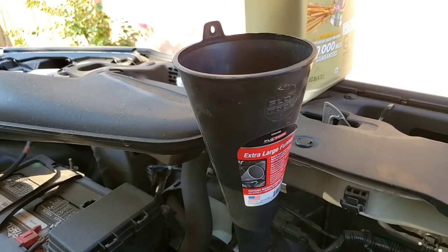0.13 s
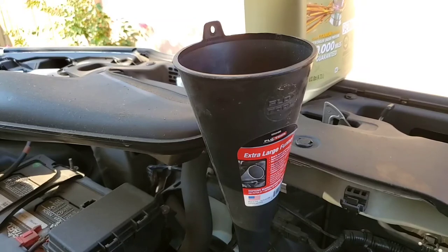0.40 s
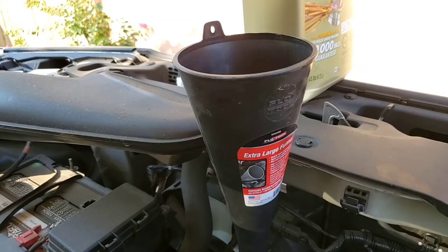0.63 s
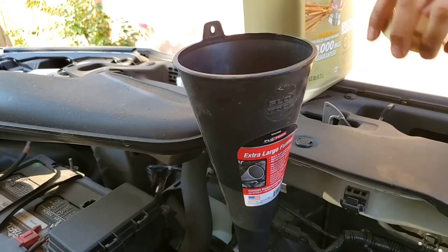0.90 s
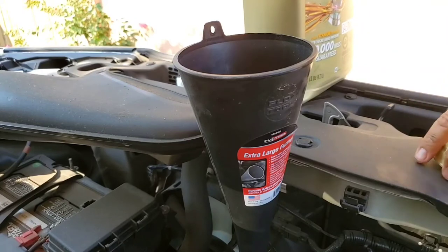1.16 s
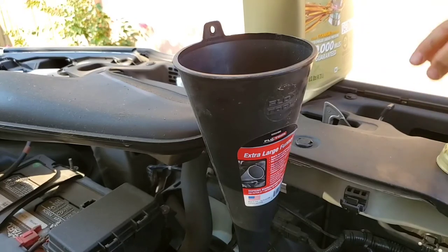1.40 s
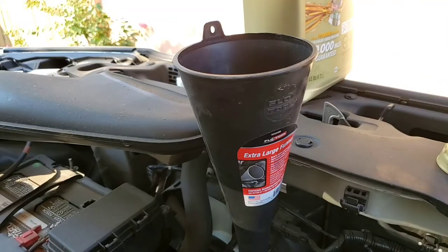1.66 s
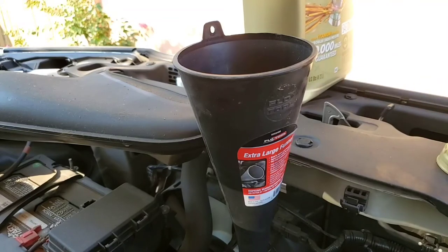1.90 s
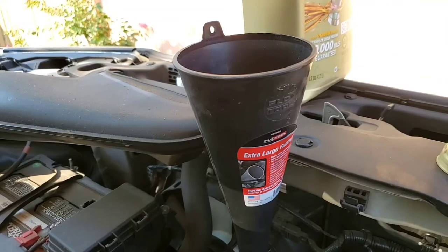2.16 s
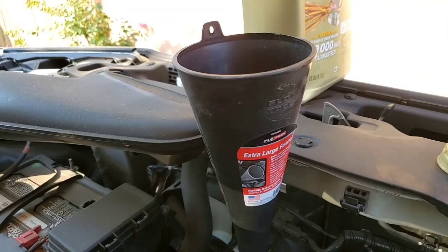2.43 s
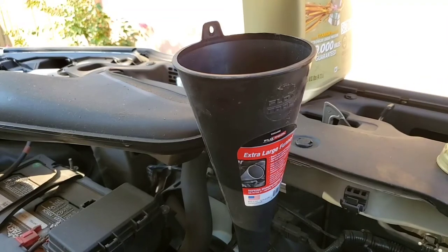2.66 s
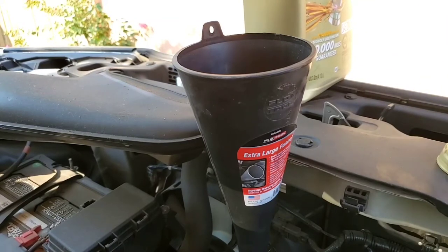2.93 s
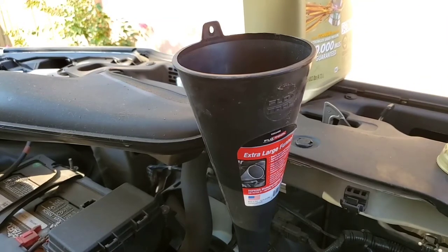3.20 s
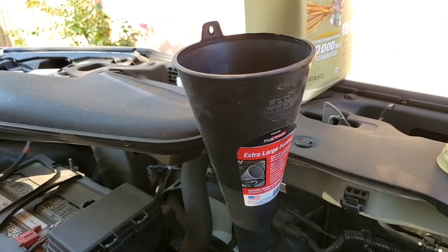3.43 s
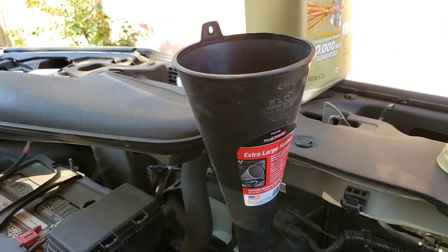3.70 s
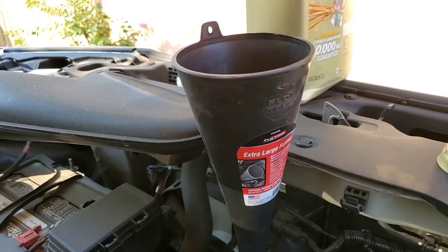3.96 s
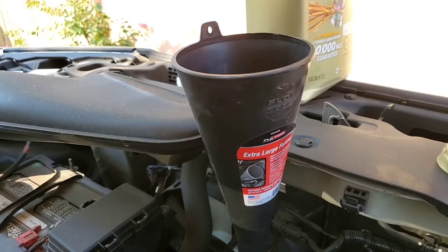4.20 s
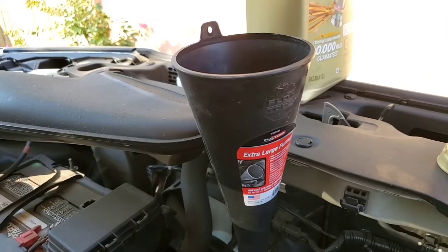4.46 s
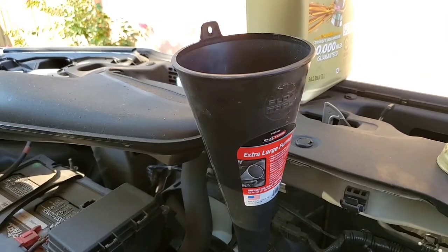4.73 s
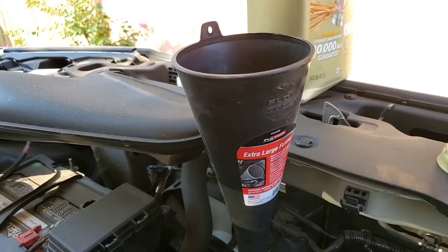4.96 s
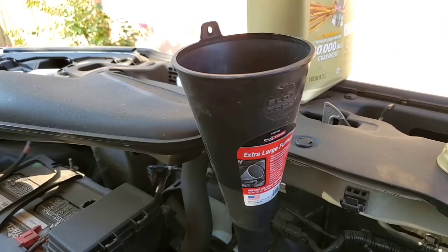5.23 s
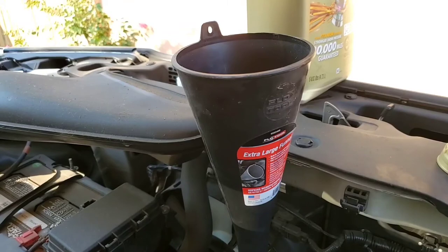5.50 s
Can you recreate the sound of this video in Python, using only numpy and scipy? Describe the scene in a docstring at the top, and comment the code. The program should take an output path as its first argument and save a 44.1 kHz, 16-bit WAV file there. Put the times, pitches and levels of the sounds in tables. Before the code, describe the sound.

Outdoors at an open engine bay, a plastic cap clatters off a jug, then after a pause is knocked down on a plastic cover in sharp, boomy blows. A tighter cluster of drops follows, then faint ticks and rustling. The camera sits close, adding slight hiss and a thin, high whine over low traffic rumble.

```python
"""A plastic cap rattles off its jug over an open engine bay, then is set down and dropped on the engine cover.
Contacts are noise chatter through the object's modes and a bay tail; tocks and body booms are decaying sines.
Hands rustle in bands of noise; a low rumble and open air are noise; thin high tones are gliding sines.
The camera's lens drive whines thinly over its hiss, its pitch swaying while the car rocks after the drops."""
import sys
import numpy as np
from scipy import signal
from scipy.fft import rfft, irfft
from scipy.io import wavfile
from scipy.ndimage import uniform_filter1d, map_coordinates

SR = 44100
rng = np.random.default_rng(int(sys.argv[2]) if len(sys.argv) > 2 else 0)


def store_wav(level_fs):
    """Save 16-bit WAV to argv[1]."""
    pcm = np.round(np.clip(np.atleast_2d(level_fs), -1, 1) * 32767)
    wavfile.write(sys.argv[1], SR, pcm.T.astype(np.int16))


def volts_from_db(level):
    """Convert decibel levels to linear amplitude ratios."""
    exponent = np.asarray(level, float) / 20
    return 10 ** exponent


N = 247401
T = np.arange(N) / SR


def unit(x):
    """Scale to rms 1."""
    return x / np.sqrt(np.mean(x ** 2) + 1e-20)


def along(points, hz):
    """Interpolate (Hz, value) points on a log frequency axis."""
    point_hz, values = np.transpose(points)
    return np.interp(np.log(hz + 1), np.log(point_hz + 1), values)


def curves(rows):
    """One value per sample for each column after the time."""
    s, *columns = np.transpose(rows)
    return [np.interp(T, s, column) for column in columns]


def wobble(rate_hz):
    """A smooth random curve with rate_hz knots a second, 200 at most."""
    knots = rng.standard_normal(int(N * 200 / SR) + 4)
    return map_coordinates(knots, [T * min(rate_hz, 200)])


def swell(start_s, length_s, edge_s):
    """A gate that opens before and closes after its length, over the edge time."""
    end_s = start_s + length_s
    return np.interp(T, [start_s - edge_s, start_s, end_s, end_s + edge_s], [0, 1, 1, 0])


def rush(spectrum, patchy_db):
    """Coloured noise of rms 1 with time-frequency patches of random gain."""
    hz, _, z = signal.stft(rng.standard_normal(N), SR, nperseg=2048, noverlap=1792)
    patches = uniform_filter1d(rng.standard_normal(z.shape), 16, 0)
    patches = unit(uniform_filter1d(patches, 8, 1))
    z = z * volts_from_db(along(spectrum, hz)[:, None] + patchy_db * patches)
    return unit(signal.istft(z, nperseg=2048, noverlap=1792)[1][:N])


# Low rumble: traffic hum, with body boom swelling at the blows. Each row: time in seconds, level in dB.
LOW_RUMBLE_LEVEL = [(0.0, -58), (0.33, -50), (0.9, -58), (1.29, -52), (1.7, -60), (2.3, -51.5),
                    (2.87, -52.5), (3.2, -62.5), (3.7, -44), (4.2, -52), (4.4, -60), (5.08, -54),
                    (5.3, -65), (5.61, -55.5)]
# Colour of the low rumble. Each row: frequency in Hz, relative density in dB per Hz.
LOW_RUMBLE_SPECTRUM = [(12, -55.5), (20, -12.5), (67, -0.5), (87, -4), (119, 9), (133, -1), (156, -15.5),
                       (203, -9.5), (228, -28.5), (264, -32.5), (400, -29), (520, -112), (880, -120)]


def low_rumble():
    """Low noise with a wavering level: traffic hum, with body boom swelling at the blows."""
    level_db, = curves(LOW_RUMBLE_LEVEL)
    return volts_from_db(level_db + 2.8 * wobble(5)) * rush(LOW_RUMBLE_SPECTRUM, patchy_db=1.5)


# Colour of open air. Each row: frequency in Hz, relative density in dB per Hz.
AIR_SPECTRUM = [(120, -27.5), (200, -0.5), (338, -2), (443, -16), (496, -7.5), (738, -11.5), (812, 0),
                (1540, -18.5), (3350, -9.5), (4400, -17.5), (6340, -14.5), (8180, -35), (9000, -28.5),
                (11700, -55.5), (19800, -120)]
AIR_DB = -65


def open_air():
    """Open air hisses steadily as patchy noise."""
    return volts_from_db(AIR_DB) * rush(AIR_SPECTRUM, patchy_db=2.2)


# Thin high tones: far chirps, and at 3.7 s a ring fading after a knock.
# Each row: start in seconds, length in seconds, start pitch in Hz, end pitch in Hz, start level in dB.
THIN_TONES = [(0.973, 0.16, 2310, 2350, -64), (1.073, 0.04, 3700, 3580, -59),
              (2.53, 0.064, 3490, 4270, -62), (3.697, 0.14, 6400, 6360, -58),
              (5.295, 0.24, 4480, 4440, -67)]
TONE_EDGE_S, TONE_FADE_DB = 0.012, -4  # fade: start to end


def thin_tones():
    """Far chirps, and one ring fading after a knock: thin gliding sines, roughened in level and pitch."""
    out = np.zeros(N)
    for s, length_s, start_hz, end_hz, db in THIN_TONES:
        hz, fade_db = curves([(s, start_hz, 0), (s + length_s, end_hz, TONE_FADE_DB)])
        flutter = 1 + 0.75 * wobble(200)
        tone = np.sin(2 * np.pi * np.cumsum(hz + 70 * wobble(200)) / SR)
        out += swell(s, length_s, TONE_EDGE_S) * volts_from_db(db + fade_db) * flutter * tone
    return out


# The camera's own hiss. Each row: frequency in Hz, relative density in dB per Hz.
HISS_SPECTRUM = [(5000, -32), (7000, -8.5), (8800, -15), (9100, -1), (10050, -4.5), (10200, -10),
                 (12000, -15), (15400, -18.5), (16000, -16.5)]


def camera_hiss():
    """The camera's steady hiss is patchy treble noise."""
    return volts_from_db(-77.5) * rush(HISS_SPECTRUM, patchy_db=3.4)


# Lens drive pitch. Each row: time in seconds, frequency in Hz.
WHINE_PITCH = [(0, 9415), (1.4, 9395), (1.75, 9460), (2.3, 9425), (3, 9485), (3.35, 9420), (4.7, 9368),
               (5.61, 9440)]
# The car rocks after the drops. Each row: start in seconds, length in seconds, sway depth in Hz.
ROCKING_SPANS = [(1.97, .7, 72), (3.35, 1.5, 45)]
SWAY_RATE_HZ, FOLD_HZ = 12, 29500


def lens_whine():
    """The stabiliser's tone sways while the car rocks; a fainter fold-over tone moves against it."""
    hz, = curves(WHINE_PITCH)
    depth_hz = sum(depth * swell(s, length_s, 0.15) for s, length_s, depth in ROCKING_SPANS)
    sway_hz = depth_hz * np.cos(2 * np.pi * SWAY_RATE_HZ * (T - 4.13)) + 5 * wobble(15)
    phase = 2 * np.pi * np.cumsum(hz + sway_hz) / SR
    fold = np.sin(2 * np.pi * FOLD_HZ * T - 2 * phase)
    return volts_from_db(-70.5 + 2.6 * wobble(12)) * (np.sin(phase) + volts_from_db(-18.5) * fold)


# How busy the hands are. Each row: time in seconds, activity in dB.
HAND_ACTIVITY = [(0.0, -54.5), (0.25, -63.5), (0.52, -58.5), (0.75, -72), (0.98, -61.5), (1.17, -61.5),
                 (1.5, -69), (1.89, -63), (2.1, -60.5), (2.48, -61), (2.7, -62.5), (3.0, -63.5),
                 (3.16, -76), (3.55, -63), (3.75, -63), (4.05, -57.5), (4.2, -72), (4.6, -73),
                 (4.85, -64.5), (5.2, -81), (5.38, -59.5), (5.61, -66)]
# Colours of the two rubbing bands. Each row: frequency in Hz, relative density in dB per Hz.
RUB_LOW_SPECTRUM = [(120, -19.5), (200, 7.5), (324, -19.5), (358, -13), (396, -1), (2050, -10.5),
                    (2200, -43.5), (2860, -47), (4840, -120)]
RUB_HIGH_SPECTRUM = [(1180, -51.5), (2000, -22.5), (2340, -6.5), (2590, -6.5), (3690, -7.5), (4000, -10.5),
                     (4650, -10), (8800, -20.5), (11400, -53.5), (19400, -120)]
RUB_LOW_SWING, RUB_LOW_DB, RUB_PIVOT_DB = 1.7, -1.5, -64  # low band swings more steeply about the pivot


def rustle():
    """Fingers slide over plastic: two bands of noise share a grainy level."""
    busy_db, = curves(HAND_ACTIVITY)
    low_db = RUB_PIVOT_DB + RUB_LOW_DB + RUB_LOW_SWING * (busy_db - RUB_PIVOT_DB)
    grain = wobble(58)
    low = volts_from_db(low_db + 2.5 * grain) * rush(RUB_LOW_SPECTRUM, patchy_db=1.5)
    high_db = busy_db - 3 + 1.5 * grain + 1.5 * wobble(150)
    return low + volts_from_db(high_db) * rush(RUB_HIGH_SPECTRUM, patchy_db=1.2)


# Blows that reach the car body. Each row: start in seconds, level in dB, lowest mode in Hz.
BODY_BOOMS = [(0.356, -27.5, 78.3), (0.459, -30, 65.4), (1.327, -36.5, 132), (1.945, -26.5, 118.7),
              (2.271, -17, 76.3), (2.32, -21.5, 61.6), (2.646, -42, 147), (2.922, -37.5, 78.2),
              (3.338, -28.5, 67.7), (3.388, -26.5, 62.4), (3.618, -21.5, 64.8), (3.668, -19.5, 125.7),
              (3.896, -19.5, 81.7), (3.991, -31.5, 76), (5.034, -42.5, 107.3), (5.085, -35, 81.4)]
BODY_T60_80HZ_S, BODY_DAMPING = 0.34, 0.93  # higher pitches die sooner by this power
BODY_RISE_S = 0.0088


def booms():
    """The heavy car body takes a moment to swing up, then rings low in a few close modes."""
    out, t = np.zeros(N + SR), np.arange(SR) / SR
    for s, db, hz in BODY_BOOMS:
        t60_s = BODY_T60_80HZ_S * (hz / 80) ** -BODY_DAMPING
        swing = np.zeros(SR)
        for ratio, mode_db in [(1, -1), (1.25, -10), (1.8, -6)]:
            swing += volts_from_db(mode_db) * np.sin(2 * np.pi * (hz * ratio * t + rng.random()))
        out[round(s * SR):][:SR] += volts_from_db(db - 60 * t / t60_s) * (1 - np.exp(-t / BODY_RISE_S)) * swing
    return out[:N]


# Single-pitch contacts of the hollow cap. Each row: start in seconds, level in dB, pitch in Hz.
CAP_TOCKS = [(0.27, -33.5, 1062), (0.2933, -35.5, 1970), (0.315, -35.5, 1085), (0.3447, -14.5, 2800),
             (0.359, -1.5, 964), (0.399, -10.5, 592), (0.4, -20.5, 1870), (0.4554, -18, 1960),
             (0.456, -17, 644), (0.504, -27, 1140), (1.314, -31.5, 396), (1.33, -28, 1490),
             (1.333, -25, 391), (1.349, -26, 381), (1.879, -38.5, 2800), (1.9469, -13.5, 3360),
             (1.997, -21.5, 506), (2.02, -35, 1500), (2.273, -14.5, 312), (2.275, -12.5, 724),
             (2.3205, -16, 1424), (2.4836, -43.5, 3060), (2.5745, -53, 2920), (2.651, -35, 1024),
             (2.6953, -48.5, 2950), (3.3388, -10.5, 3000), (3.34, -7, 1034), (3.386, -26, 357),
             (3.4, -24.5, 1450), (3.62, -8, 1400), (3.6227, -9, 3060), (3.685, -19.5, 1430),
             (3.757, -41, 1348), (3.812, -46.5, 1390), (3.9, -10.5, 3140), (3.902, -20, 313),
             (3.919, -9.5, 630), (3.994, -26.5, 953), (3.995, -30, 1423), (4.0582, -46, 1450),
             (4.06, -33.5, 426), (4.6967, -51, 2470), (4.755, -52, 2470), (4.8465, -39, 2955),
             (4.988, -50.5, 3050), (5.0357, -29.5, 3040), (5.0839, -36.5, 1465)]
# Ring time of a tock at the reference level. Each row: frequency in Hz, t60 in seconds.
TOCK_RING = [(300, 0.081), (400, .05), (1200, .028), (3000, 0.04)]
TOCK_REF_DB, TOCK_SOFT_DB = -12.5, -0.19  # dB of ring time per dB of level: soft tocks ring longer


def tocks():
    """The cap's hollow rings on one pitch; higher rings are rougher, their phase wandering."""
    out, t = np.zeros(N + SR), np.arange(SR // 4) / SR
    for s, db, hz in CAP_TOCKS:
        t60_s = along(TOCK_RING, hz) * volts_from_db(TOCK_SOFT_DB * (db - TOCK_REF_DB))
        wander = uniform_filter1d(np.cumsum(rng.standard_normal(len(t))), size=24)
        drift = wander * 0.04 * (hz / 1000) ** 1.3
        envelope = volts_from_db(db - 60 * t / t60_s) * (1 - np.exp(-(t / 0.001) ** 2))
        out[round(s * SR):][:len(t)] += envelope * np.sin(2 * np.pi * hz * t + drift)
    return out[:N]


# The engine bay rings on. Each row: frequency in Hz, t60 in seconds.
BAY_RING = [(100, 0.27), (300, 0.41), (1000, 0.26), (2500, .2), (6000, 0.16), (12000, 0.17)]


def bay_tail(size):
    """One answer of the engine bay: each frequency dies at its own speed, and loose parts make it lumpy."""
    hz, t, z = signal.stft(rng.standard_normal(size), SR, nperseg=256)
    lumps = volts_from_db(4 * rng.standard_normal(len(t)))
    decay = volts_from_db(-60 * t / along(BAY_RING, hz)[:, None])
    tail = signal.istft(z * lumps * decay, SR, nperseg=256)[1][:size]
    tail *= 1 - np.exp(-np.arange(size) / SR / 0.0044)
    return tail / np.linalg.norm(tail)


# Colours of the bay's answer and of a plain contact. Each row: frequency in Hz, gain in dB.
BAY_GAIN = [(60, -6), (190, 11), (255, -5.5), (320, 9.5), (500, 1), (1500, -2.5), (4000, -3), (12000, 1.5)]
CONTACT_GAIN = [(60, -3), (300, 11), (1100, 13.5), (2800, -1), (7000, 2), (11000, -10), (16000, -23)]
MIDDLE_SHARE, MIDDLE_DB = 0.69, -2.5  # how much of the dull column reaches the middle range
TOP_SHARE = 1.4  # the highest treble follows the bright column more steeply
CRACK, CRACK_S = 0.8, 0.0021  # first touch in the chatter: size at 0 dB, life


def knocks(hits, modes, fill_db, tail_db, rise_s, drive_db, bass_db):
    """Each contact is a short noise chatter that rings the object's modes anew and the bay behind it."""
    size, lead = 20480, 200  # samples; the lead holds filter ringing ahead of the contact
    out, t, hz = np.zeros(N + size), np.arange(size) / SR, np.fft.rfftfreq(size, 1 / SR)
    mode_hz, width_hz, mode_db = np.transpose(modes)[:, :, None]
    width_hz = np.maximum(width_hz, mode_hz / 25)  # plastic damps its modes
    signs = (-1) ** np.arange(len(mode_hz))[:, None]
    resonance = 1j * hz * width_hz / (mode_hz ** 2 - hz ** 2 + 1j * hz * width_hz)
    shapes = signs * volts_from_db(mode_db) * resonance
    tail_gain = volts_from_db(tail_db + along(BAY_GAIN, hz))
    tails = [tail_gain * rfft(bay_tail(size=16384), size) for _ in range(12)]
    fade = np.minimum(t * SR / lead, 1) ** 2 * np.clip((t[-1] - t) / 0.1, 0, 1)
    for k, (s, db, dull_db, bright_db, t60_s) in enumerate(hits):
        chatter = rng.standard_normal(size) * volts_from_db(2.0 * rng.standard_normal(size))  # uneven grains
        attack = 1 - np.exp(-t / (rise_s * volts_from_db(-0.1 * db)))  # soft contacts build slower
        chatter *= volts_from_db(-60 * t / np.clip(t60_s, 0.003, 0.3)) * attack
        chatter += CRACK * volts_from_db(0.15 * db) * np.exp(-t / CRACK_S) * rng.standard_normal(size)
        ring = volts_from_db(fill_db) + volts_from_db(rng.normal(0, 2.5, len(mode_hz))) @ shapes
        # the modes give the fine colour, the blow the broad one
        broad_ring = np.sqrt(uniform_filter1d(abs(ring) ** 2, 560))
        tilt = [(200, dull_db + bass_db), (500, dull_db), (1100, MIDDLE_DB + MIDDLE_SHARE * dull_db),
                (2800, 0), (7000, bright_db), (14000, TOP_SHARE * bright_db)]
        colour_db = along(CONTACT_GAIN, hz) + along(tilt, hz)
        blow = rfft(chatter / np.linalg.norm(chatter)) * ring / broad_ring
        # the bay is too dense to keep single modes; hard blows wake it more
        spread = np.sqrt(uniform_filter1d(abs(blow) ** 2, 300))
        answer = spread * tails[k % 12] * volts_from_db(0.15 * db)
        heard = (blow + answer) * volts_from_db(colour_db + db + drive_db)
        out[round(s * SR):][:size] += np.roll(irfft(heard), lead) * fade
    return out[lead:N + lead]


HARD_DB = -13  # cover contacts above this level are followed by settling
SETTLE_S, SETTLE_DB, SETTLE_DB_PER_S = 0.2, -46, -90.5  # span, level at the blow, fall
SETTLE_DULL_DB, SETTLE_BRIGHT_DB = 18, -12


def settling(hits):
    """After each hard blow the cap rocks to rest in four dull, ever weaker contacts."""
    blow_s = np.array([row[0] for row in hits if row[1] > HARD_DB])[:, None]
    after_s = SETTLE_S * (np.arange(4) + rng.random((len(blow_s), 4))) / 4
    times_s = (blow_s + after_s).ravel()
    levels_db = (SETTLE_DB + SETTLE_DB_PER_S * after_s).ravel()
    return [(s, db, SETTLE_DULL_DB, SETTLE_BRIGHT_DB, 0.025) for s, db in zip(times_s, levels_db)]


# Contacts on the jug. Each row: start in seconds, level before drive in dB, dull gain in dB,
# bright gain in dB, contact t60 in seconds.
JUG_CONTACTS = [(0.027, -43, -1.5, 7.5, 0.09), (0.0489, -47, -3, 11.5, 0.046),
                (0.2529, -29.5, -16.5, -16, 0.041), (0.2666, -23.5, -14, -14, 0.036),
                (0.2901, -34.5, -6, -13.5, 0.038), (0.3139, -36, -5, -12, 0.043),
                (0.327, -38.5, -4.5, 3, 0.059), (0.3448, -8, -8, -4.5, 0.018),
                (0.3558, -6.5, -14.5, -8.5, 0.031), (0.3744, -25.5, 12, -11.5, 0.024),
                (0.398, -19, 1.5, -19.5, 0.042), (0.4512, -27.5, -2, -10, 0.017),
                (0.4594, -14.5, -9.5, -17, 0.046), (0.4675, -26, -5.5, 2, 0.036),
                (0.4833, -30, -1, -8, 0.09), (0.5053, -27, -9, -15, 0.021)]
# Jug modes. Each row: frequency in Hz, least width in Hz, mean level in dB.
JUG_MODES = [(614, 62.7, -15), (940, 37, -4.5), (1980, 80, -13), (2264, 36, -2.5), (2470, 15, -3.5),
             (2800, 80, -7.5), (3456, 20, -19.5), (3383, 21, -25.5), (4320, 29, -8), (6160, 47, -29),
             (7100, 52, -24.5), (7330, 37, 0), (8500, 25, -26.5)]


def jug_rattle():
    """The cap rattles off the jug: quick contacts ring the jug's modes."""
    return knocks(JUG_CONTACTS, JUG_MODES, fill_db=-7.5, tail_db=-11.5, rise_s=0.0012, drive_db=21.0, bass_db=-12)


# Contacts on the engine cover. Each row: start in seconds, level before drive in dB, dull gain in dB,
# bright gain in dB, contact t60 in seconds.
COVER_CONTACTS = [(1.3096, -36.5, 2, -7, 0.076), (1.3264, -34.5, 2.5, -3, 0.14),
                  (1.3482, -34, -22, -6, 0.035), (1.8549, -42, -20, -4, 0.025), (1.8805, -35, -15, 2, 0.11),
                  (1.9462, -7.5, -5.5, -5, 0.025), (1.9975, -13.5, -8.5, -7, 0.038),
                  (2.0294, -41.5, 10.5, -10, 0.0093), (2.2711, 7, -19, -23, 0.031),
                  (2.2826, -14, 7, -13, 0.041), (2.3191, -28, 12, -6.5, 0.022),
                  (2.336, -22.5, -6.5, 2, 0.024), (2.4838, -48, -5, 7, 0.08),
                  (2.582, -41, -32.5, -16, 0.038), (2.6495, -31, 1.5, -9.5, 0.052),
                  (2.6953, -44, -10, -7, 0.071), (2.7385, -31, -10.5, -7, 0.12),
                  (2.7924, -44.5, 1.5, 2, 0.12), (2.8199, -56, -2, 7, 0.036), (2.8988, -54.5, 2, 3, 0.089),
                  (2.9217, -48.5, 12.5, 1, 0.09), (3.3373, -2, -15, -18, 0.02),
                  (3.3564, -23, -5.5, -1, 0.04), (3.3866, -39.5, 20.5, -21, 0.068),
                  (3.5154, -39, -8.5, -10.5, 0.019), (3.6207, 1.5, -12.5, -12.5, 0.026),
                  (3.6346, -16, -6.5, -17.5, 0.045), (3.6546, -18.5, 1, -20, 0.055),
                  (3.6728, -10, -5.5, -12, 0.013), (3.899, -5.5, -3, -3, 0.035),
                  (3.905, 1, -19.5, -8.5, 0.047), (3.9193, -11, 2, -8.5, 0.019),
                  (3.9392, -33.5, 2.5, -8, 0.11), (3.9929, -31, 12, -10, 0.039),
                  (4.0611, -56.5, 19.5, -12, 0.016), (4.4586, -41, -22.5, -10, 0.035),
                  (4.686, -34, -11, -13, 0.078), (4.698, -34, -38, -12, 0.022),
                  (4.7964, -51.5, 12, -2, 0.087), (4.8384, -41, -12, -8, 0.022), (4.855, -47, 4, 4, 0.039),
                  (4.8742, -43, -6, -1, 0.12), (4.8912, -50, -12, 6, 0.014), (4.977, -54, 10, 8, 0.048),
                  (5.0004, -49, 13.5, 1, 0.066), (5.026, -32.5, 4, -1.5, 0.0095),
                  (5.0353, -29.5, 1, 4.5, 0.034), (5.0822, -34.5, 9, -36, 0.028),
                  (5.4236, -46.5, 3.5, 9.5, 0.047)]
# Cover modes. Each row: frequency in Hz, least width in Hz, mean level in dB.
COVER_MODES = [(300, 44, -27), (747.5, 60, 0), (1082, 45, -9), (1390, 30, 0), (1440, 120, -22),
               (2054, 8, -4), (2390, 53, -35.5), (3060, 9.3, -1.5), (3590, 22, -59), (3770, 28, -5.5),
               (5036, 24, 2.5), (5530, 75, 3), (6380, 9.7, -3.5), (6720, 31, -7), (8000, 41, -19),
               (7930, 44, -11), (8490, 27, -48), (10100, 56, -31.5)]


def cover_knocks():
    """The cap knocks and bounces on the engine cover, ringing its modes, and settles after hard blows."""
    hits = COVER_CONTACTS + settling(COVER_CONTACTS)
    return knocks(hits, COVER_MODES, fill_db=-10, tail_db=-6.5, rise_s=0.0032, drive_db=19, bass_db=2.5)


def scene():
    """All sources at one microphone."""
    background = low_rumble() + open_air() + thin_tones() + camera_hiss() + lens_whine()
    handling = rustle() + booms() + tocks() + jug_rattle() + cover_knocks()
    return (background + handling)[None]


def roll_off(x):
    """The treble ends steeply here."""
    return signal.sosfilt(signal.butter(12, 16470, fs=SR, output="sos"), x)


def record(dry):
    """Peaks round off softly, the microphone loses the deepest bass, and the top is band-limited."""
    soft = dry / (1 + abs(dry / 0.98) ** 4) ** (1 / 4)
    hz = np.fft.rfftfreq(N, 1 / SR)
    top = np.clip((15750 - hz) / 300, 0, 1) ** 2
    bass_cut = 1 / (1 - 1j * 45 / (hz + 1))
    finished = irfft(rfft(soft) * top * bass_cut, N)
    return roll_off(finished)


dry = scene()
out = record(dry)
store_wav(out)
```